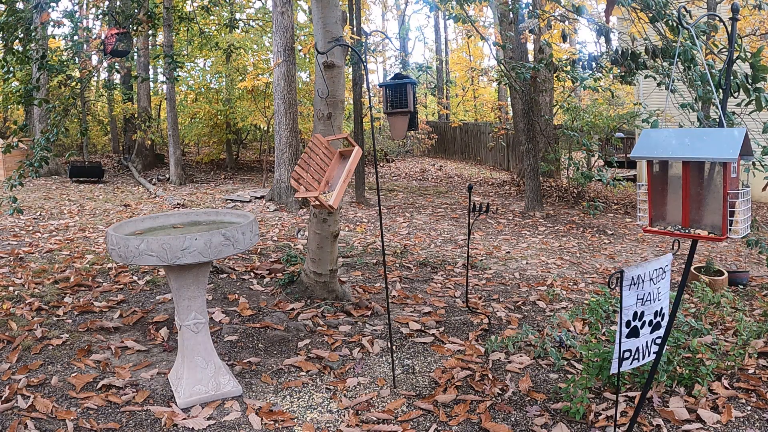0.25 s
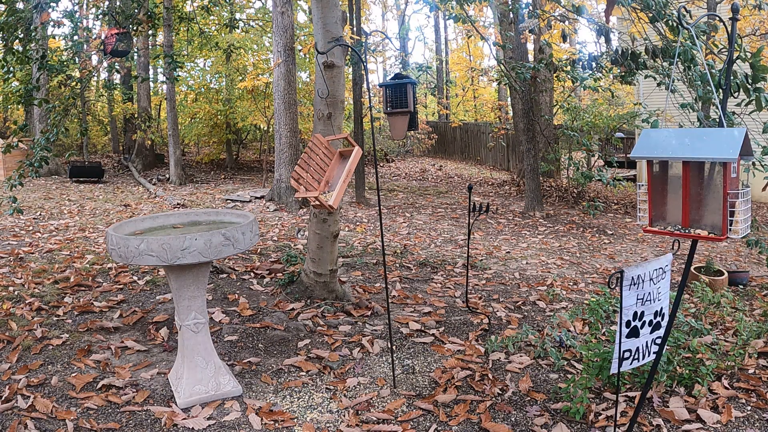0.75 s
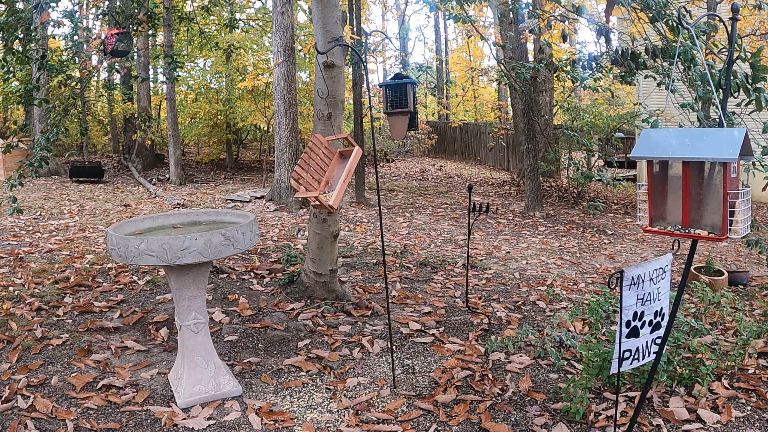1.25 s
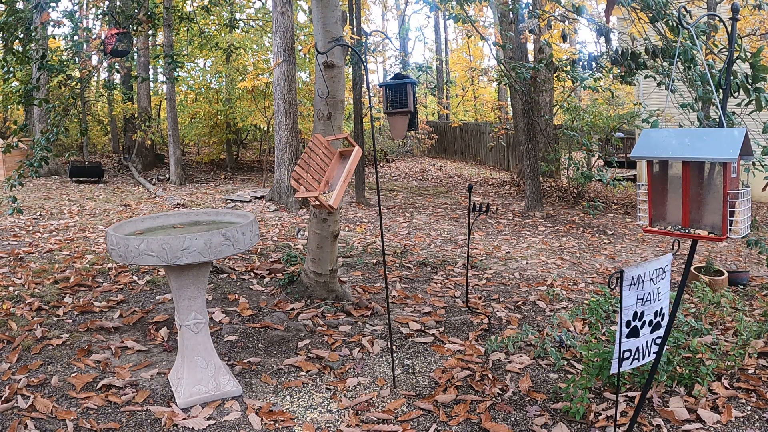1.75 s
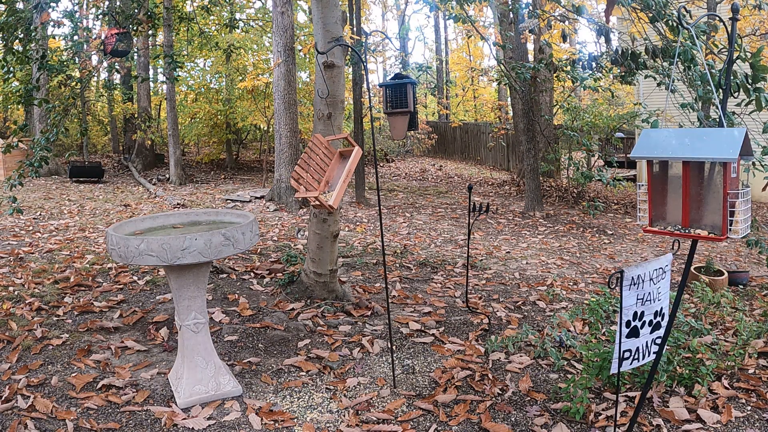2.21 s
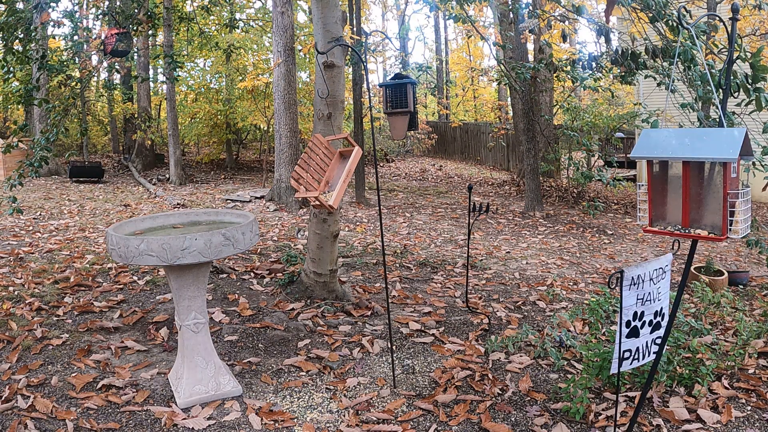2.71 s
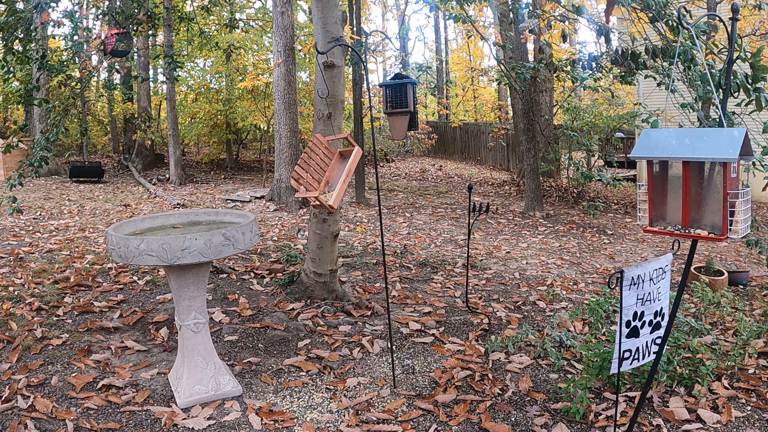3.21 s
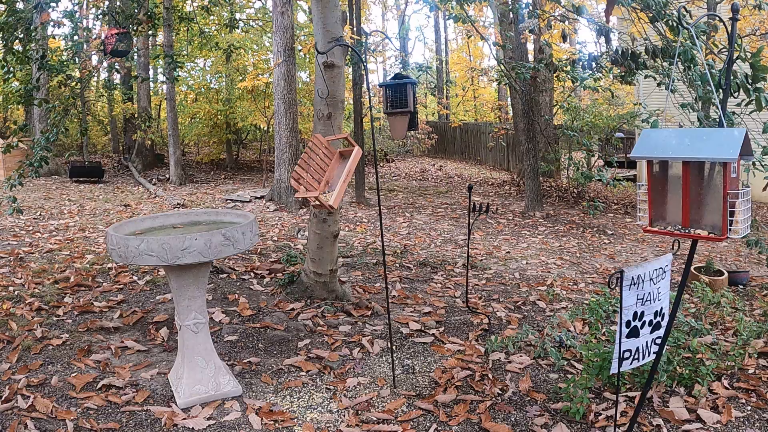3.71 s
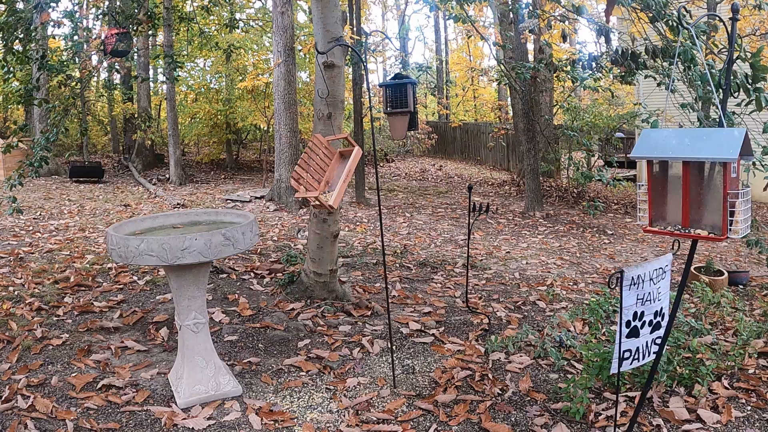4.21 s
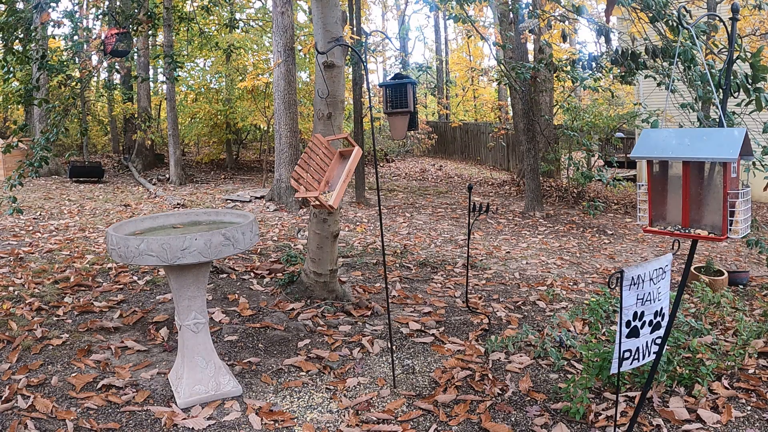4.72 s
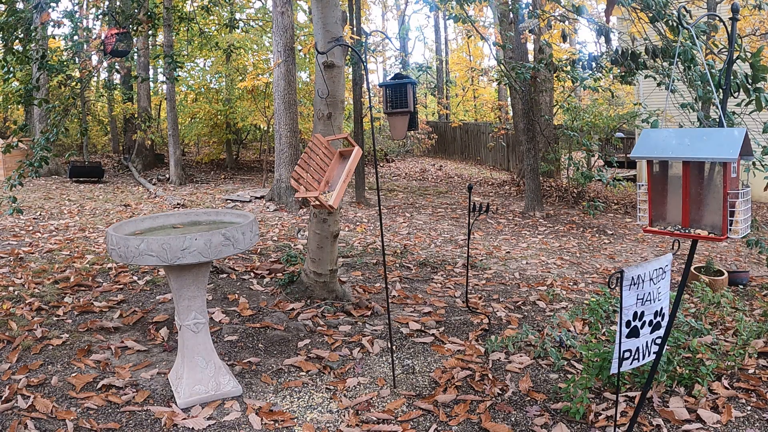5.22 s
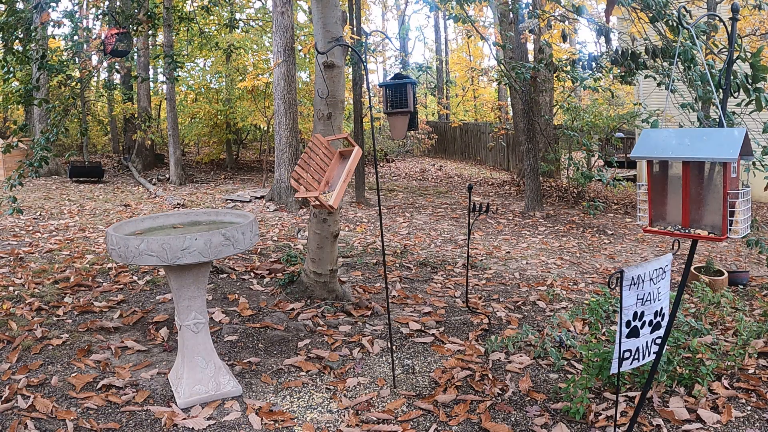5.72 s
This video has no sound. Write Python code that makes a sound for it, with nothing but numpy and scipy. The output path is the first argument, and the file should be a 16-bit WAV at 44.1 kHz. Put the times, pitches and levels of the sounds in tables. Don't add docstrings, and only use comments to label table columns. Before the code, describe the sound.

A far wren tumbles through quick whistled phrases in a leafy backyard, with sharp chips and a faint buzz over low steady highway rumble.

```python
import sys
import numpy as np
from scipy import signal
from scipy.fft import rfft, irfft
from scipy.io import wavfile
from scipy.ndimage import uniform_filter1d

SR = 44100
rng = np.random.default_rng(int(sys.argv[2]) if len(sys.argv) > 2 else 0)


def dump_mix(stems):
    frames = np.atleast_2d(stems).T
    limited = np.clip(frames, -1, 1)
    pcm = np.round(limited * 32767).astype(np.int16)
    wavfile.write(sys.argv[1], SR, pcm)


def gain_from_decibels(decibels):
    exponent = np.asarray(decibels, float) / 20
    return 10 ** exponent


N = 262395
FREQ = np.arange(N // 2 + 1) * SR / N
TIME = np.arange(N) / SR


def over_hz(table):
    hz, value = np.transpose(table)
    return np.interp(np.log(FREQ + 1), np.log(hz), value)


def stereo_noise(colour):
    # f/Hz, side minus mid level/dB
    port_width = [(60, -22.5), (100, -27), (180, -15), (310, -12), (530, -11), (910, -9), (1570, -7),
                  (2710, -4), (4670, -8.5), (8050, -7.5)]
    # f/Hz, left minus right level/dB
    port_lean = [(60, 0.38), (100, 0.42), (180, 0.5), (310, 0.33), (530, 0.7), (910, 0.72), (1570, 1.4),
                 (2710, 2.8), (4670, 0.44), (8050, 1)]
    port_lag_s = 1.2e-5
    mid, side = rfft(rng.standard_normal((2, N))) * gain_from_decibels(over_hz(colour))
    side = side * gain_from_decibels(over_hz(port_width))
    lean = gain_from_decibels(over_hz(port_lean) / 2) * np.exp(-1j * np.pi * FREQ * port_lag_s)
    out = irfft(np.array([(mid + side) * lean, (mid - side) / lean]), N)
    return out / np.std(out.mean(axis=0))


def walk(rate):
    hold = int(SR / rate)
    steps = np.repeat(rng.standard_normal(N // hold + 1), hold)
    slewed = uniform_filter1d(uniform_filter1d(steps, hold), hold)[:N]
    return slewed / np.std(slewed)


def engines():
    # t/s, level/dB
    load = [(0.0, -38.5), (0.21, -45.5), (0.23, -39), (0.61, -45.5), (0.64, -44), (1.26, -36.5),
            (1.34, -41.5), (3.65, -40.5), (3.68, -34), (3.84, -39.5), (4.27, -42.5), (4.39, -38.5),
            (4.79, -44), (4.92, -39), (5.88, -40.5), (5.95, -40)]
    # f/Hz, level per Hz/dB
    rumble_colour = [(10, -9.5), (28, 0), (50, 5), (75, 4), (115, 0), (160, -10.5), (200, -13),
                     (290, -32.5), (400, -38.5), (2000, -110)]
    load_db = np.interp(TIME, *np.transpose(load))
    return stereo_noise(rumble_colour) * gain_from_decibels(load_db + 0.46)


def highway():
    # f/Hz, level per Hz/dB
    tyre_colour = [(100, -2.5), (250, -3.5), (400, -5.5), (630, -2), (1000, 0.5), (1500, -5), (2300, -13),
                   (3200, -20.5), (4500, -26), (6200, -27), (7500, -34.5), (8300, -42), (9500, -57),
                   (12000, -79)]
    return stereo_noise(tyre_colour) * gain_from_decibels(-47.5 + 0.11 * walk(1.4))


def breeze():
    # t/s, spread/s, level/dB
    puffs = [(0.0, 0.024, -83), (.3, 0.055, -81.5), (.53, .09, -84.5), (.8, .04, -88), (1.0, 0.073, -83.5),
             (1.2, .06, -83), (1.6, 0.059, -87), (1.7, 0.064, -77), (1.93, 0.091, -86), (2.58, .06, -87),
             (3.09, .055, -78.5), (3.93, .1, -89), (4.31, .05, -84), (4.55, .04, -88), (4.9, .05, -97),
             (5.7, 0.11, -85), (5.95, .03, -90)]
    calm_db, settle_db_per_s = -85.5, 1
    power = gain_from_decibels(calm_db - settle_db_per_s * TIME) ** 2
    for s, spread, db in puffs:
        power = power + gain_from_decibels(db) ** 2 * np.exp(-((TIME - s) / spread) ** 2)
    return np.sqrt(power)


def leaves():
    # f/Hz, level per Hz/dB
    leaf_colour = [(1500, -26.5), (5000, 10.5), (7600, 5.5), (8300, -1), (9000, -1.5), (10300, -6.5),
                   (11700, -10.5), (12400, -10), (13100, -20), (14000, -39)]
    crackle = gain_from_decibels(1.3 * walk(340) + 0.74 * walk(13))
    return stereo_noise(leaf_colour) * crackle * breeze() * gain_from_decibels(11.5)


def glide(s, length, start_hz, end_hz, db, bend):
    return s, length, start_hz, start_hz + bend * (end_hz - start_hz), end_hz, db


def whistles(notes, overtone_db):
    out = np.zeros(N + SR)
    for s, length, start_hz, mid_hz, end_hz, db in notes:
        u = np.arange(int(length * SR)) / (length * SR)
        hz = start_hz * (1 - u) * (1 - 2 * u) + mid_hz * 4 * u * (1 - u) + end_hz * u * (2 * u - 1)
        phase = 2 * np.pi * np.cumsum(hz) / SR
        swell = np.sin(np.pi * u) ** 0.22
        tone = np.sin(phase) + gain_from_decibels(overtone_db) * np.sin(2 * phase)
        first = int(s * SR)
        out[first:first + len(u)] += gain_from_decibels(db) * swell * tone
    return out[:N]


def woods(x, direct_db, rise_s, ring_s, ring_db, t60_s, side_db, pan_db):
    t = np.arange(int(1.2 * SR)) / SR
    early = gain_from_decibels(ring_db) / (1 + (t / ring_s) ** 8)
    shape = (1 - np.exp(-t / rise_s)) * (1 + early) * gain_from_decibels(-60 * t / t60_s)
    mid, side = rng.standard_normal((2, len(t))) * shape / np.sqrt(np.sum(shape ** 2))
    mid[0] = gain_from_decibels(direct_db)
    side = gain_from_decibels(side_db) * side
    pair = np.array([mid + side, mid - side])
    pan = gain_from_decibels(np.array([[pan_db], [-pan_db]]) / 2)
    return signal.fftconvolve(x[None], pair, axes=1)[:, :N] * pan


def song():
    # t/s, lead-in length/s, lead-in level/dB, top f/Hz, climb level/dB
    rises = [
        (1.516, 0.023, -55, 5560, -54.5),
        (2.144, 0.02, -54, 5450, -54.5),
        (2.516, 0.034, -51, 5760, -49),
        (2.905, 0.018, -46, 5730, -49.5),
        (3.265, 0.027, -45.5, 5950, -49),
        (4.81, .012, -64, 5130, -63),
    ]
    # t/s, length/s, start f/Hz,
    # end f/Hz, level/dB
    falling = [(0.561, 0.024, 4710, 4520, -62), (0.584, 0.022, 5680, 5250, -61.5),
               (0.627, 0.065, 4015, 3406, -56.5), (1.59, 0.049, 3990, 3230, -50),
               (2.218, 0.05, 4020, 3470, -51.5), (2.601, 0.049, 4110, 3870, -52),
               (2.624, 0.029, 3740, 3210, -50), (2.979, 0.053, 4180, 3230, -48),
               (3.352, 0.041, 4380, 3450, -45), (4.369, .022, 4600, 3830, -61),
               (4.379, .052, 3650, 2925, -56.5), (4.833, 0.02, 3975, 3850, -54.5),
               (4.846, .012, 3820, 3400, -54), (4.853, .04, 3380, 3260, -54.5),
               (5.12, 0.067, 5380, 4870, -69), (5.29, .04, 5980, 5950, -66)]
    # t/s, f/Hz, level/dB
    low_notes = [(.70, 2225, -56.5), (.752, 2940, -55), (1.713, 2833, -52), (2.338, 2884, -50),
                 (2.43, 2605, -49), (2.714, 2910, -51.5), (2.819, 2610, -54), (3.107, 2940, -49.5),
                 (3.189, 2490, -55), (3.455, 3005, -51), (4.50, 2050, -55.5), (4.95, 2050, -57)]
    # t/s, level/dB
    flicks = [
        (4.607, -51.5),
        (5.065, -51.5),
    ]
    overlap_s, climb_s = .006, .042
    shelf_hz, knee_hz = 4600, 4700
    scoop_hz_per_s = 14000
    low_s, above, droop = .027, 0.042, 0.053

    leads = [(s, lead + overlap_s, shelf_hz - scoop_hz_per_s * lead, shelf_hz, knee_hz, db)
             for s, lead, db, _, _ in rises]
    climbs = [glide(s + lead, climb_s, knee_hz, hz, db, bend=.58) for s, lead, _, hz, db in rises]
    falls = [glide(*note, bend=.52) for note in falling]
    lows = [(s, low_s, hz * (1 + above), hz, hz * (1 - droop), db) for s, hz, db in low_notes]
    ends = [(s, .031, 2410, 2790, 2920, db) for s, db in flicks]
    return leads + climbs + falls + lows + ends


def far_singers():
    sung = np.roll(whistles(song(), overtone_db=-45), -int(.006 * SR)) * gain_from_decibels(5.0)
    return woods(sung, direct_db=-17, rise_s=.0015, ring_s=.11, ring_db=-3,
                 t60_s=1.3, side_db=-6.0, pan_db=0.6)


def chipper():
    # t/s, length/s, start f/Hz, top f/Hz, level/dB
    chips = [
        (1.70, 0.041, 7400, 7600, -69),
        (2.399, 0.015, 5340, 7200, -56.5),
        (3.871, 0.018, 5950, 7480, -52.5),
        (5.223, 0.024, 6320, 7350, -52.5),
    ]
    chirped = whistles([glide(*chip, bend=.84) for chip in chips], overtone_db=-41)
    return woods(chirped, direct_db=0.5, rise_s=0.0052, ring_s=0.03, ring_db=-2,
                 t60_s=.9, side_db=-7.5, pan_db=2.0)


def buzzer():
    # start t/s, loudest t/s, end t/s, level/dB
    buzzes = [
        (3.904, 4.40, 4.61, -64.5),
        (5.21, 5.80, 6.64, -63),
    ]
    swell_db, fade_db = 6.5, 7.5
    out = np.zeros(N)
    pitch = 5950 * np.exp(.085 * walk(400))
    for start, loudest, end, db in buzzes:
        effort_db = np.interp(TIME, [start, loudest, end], [db - swell_db, db, db - fade_db])
        gate = np.interp(TIME, [start, start + 0.023, end, end + 0.034], [0, 1, 1, 0])
        level = gate * gain_from_decibels(effort_db + 4.5 + 1.3 * walk(28))
        out += level * np.sin(2 * np.pi * np.cumsum(pitch) / SR)
    return woods(out, direct_db=-30, rise_s=.005, ring_s=.09, ring_db=3,
                 t60_s=.9, side_db=-7, pan_db=.4)


def scene():
    return engines() + highway() + leaves() + far_singers() + chipper() + buzzer()


def low_pass(x):
    return signal.sosfilt(signal.butter(12, 13250, fs=SR, output="sos"), x)


def record(dry):
    return low_pass(dry)


dry = scene()
out = record(dry)
dump_mix(out)
```